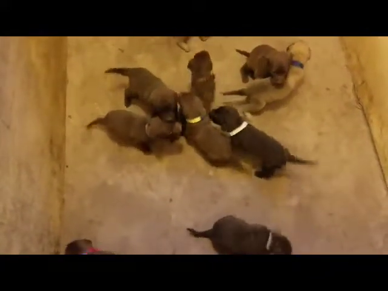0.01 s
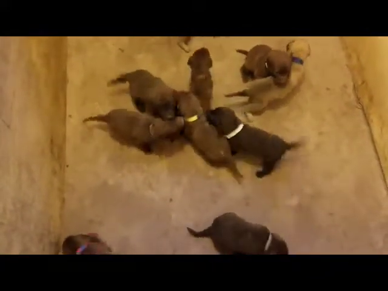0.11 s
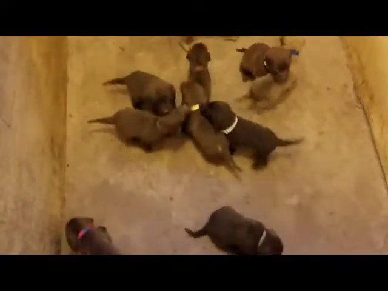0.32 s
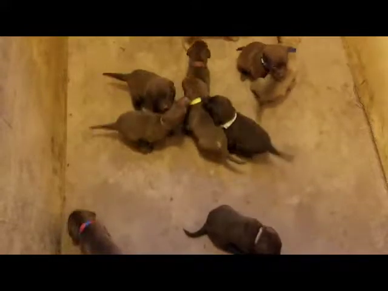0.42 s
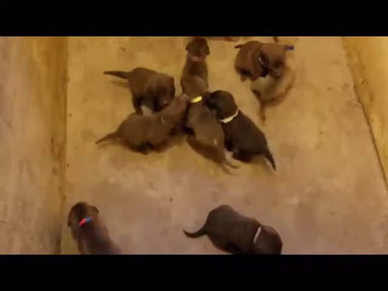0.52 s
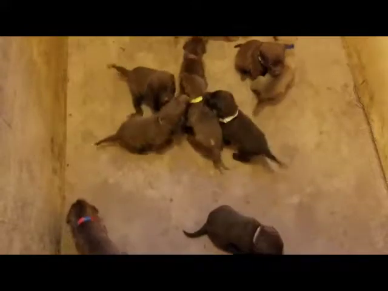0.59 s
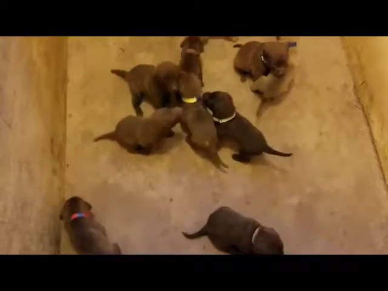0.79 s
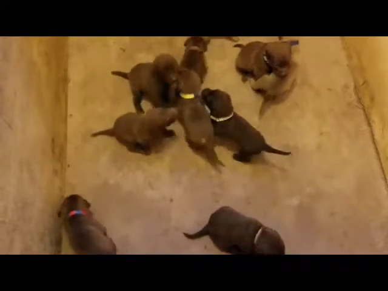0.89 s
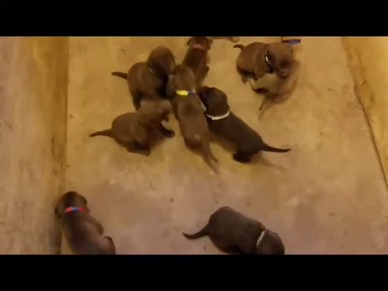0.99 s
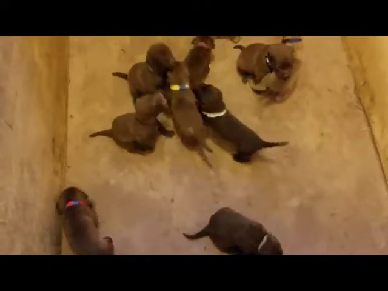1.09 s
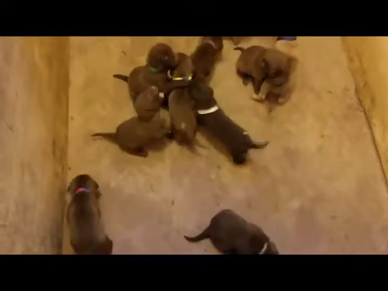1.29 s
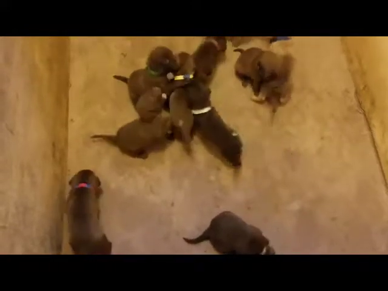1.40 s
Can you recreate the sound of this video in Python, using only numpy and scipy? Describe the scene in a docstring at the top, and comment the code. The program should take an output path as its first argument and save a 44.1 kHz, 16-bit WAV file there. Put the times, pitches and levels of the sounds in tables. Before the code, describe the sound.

One puppy yelps loudly once, breaking upward, turning raspy and sagging away; soft paw thuds and scuffs before and after, in a small hard-walled pen with a short echo, over very faint hum.

```python
"""The hum of a building, a dying whine and a faint scuff come first; then a puppy yelps in a bare concrete pen.
The yelp, a harmonic series filtered by the throat, breaks upward, turns hoarse and sags away into the room;
a ragged second tone joins it. Paws thud as a damped floor resonance and scuff as bursts of band noise.
Hum and whine are filtered noise; early echoes and a decaying diffuse tail make the pen."""
import sys
import numpy as np
from scipy import signal
from scipy.fft import rfft, irfft, next_fast_len
from scipy.io import wavfile
from scipy.ndimage import uniform_filter1d, minimum_filter1d

SR = 44100
rng = np.random.default_rng(int(sys.argv[2]) if len(sys.argv) > 2 else 0)


def digitize_waveform(pressure):
    """Quantize a signal to 16-bit integers and store it at the path in sys.argv[1].

    Rows of a 2-D input are taken as channels; values are limited to [-1, 1].
    """
    field = np.atleast_2d(pressure).T
    bounded = np.clip(field, -1, 1)
    quanta = np.round(bounded * 32767).astype(np.int16)
    wavfile.write(sys.argv[1], SR, quanta)


def magnitude_from_level(level_db):
    """Linear magnitude for a level in decibels (20 dB per decade)."""
    exponent = np.asarray(level_db, float) / 20
    return 10 ** exponent


N = 61740   # samples in the scene

# relative spectrum of the building's hum: frequency_hz, level_db
HUM_SPECTRUM = [(15, -47), (25, -22.5), (164, 1.5), (209, -12), (312, -9), (387, -12.5), (467, -10.5),
                (627, -16), (737, -15.5), (990, -18), (15300, -41.5)]
HUM_DB = -60
# left-right correlation of hum and reverberation: frequency_hz, correlation (0-1)
CORRELATION = [(60, .95), (200, .97), (400, .85), (800, .4), (3000, .3), (6000, .1)]

# decaying bands of an earlier whine: centre_hz, level_db (at time zero), t60_s
WHINE_BANDS = [(859.4, -56.5, 0.14), (1860, -59.5, 0.53)]
WHINE_EDGE_RATIO = 1.05   # band edge to centre

# paws scuffing: start_s, length_s (rise and hold), level_db, centre_hz, width_octaves
PAW_SCUFFS = [(.001, .2, -69, 6084, 2.5), (0.107, .006, -50, 850, 1.42), (0.085, 0.047, -61, 1200, 1.9),
              (.122, 0.059, -56, 1000, 2.2), (0.201, 0.062, -60, 278, 1.4),
              (0.507, 0.057, -53, 654.4, 0.19), (0.834, 0.027, -63, 351, 1.5),
              (0.864, 0.035, -63, 400, 2.44), (0.834, 0.037, -66.5, 3000, 1.1),
              (.846, 0.023, -70, 8520, 0.45), (1.038, .02, -70.5, 8420, 0.47),
              (1.103, .07, -70.5, 1240, 1.84), (1.298, 0.027, -68.5, 2715, .25),
              (1.279, 0.032, -71.5, 3540, 0.14), (1.343, .06, -64.5, 1510, 1.5)]
SCUFF_RISE_S = .004
SCUFF_FADE_S = 0.017   # time to fall by e squared

# paws landing: start_s, strike_db
PAW_THUDS = [(0.058, -52), (0.169, -47), (0.288, -52), (0.804, -57), (0.88, -50.5), (1.096, -49),
             (1.156, -53), (1.29, -52.5), (1.331, -51), (1.352, -53), (1.372, -51)]
THUD_HZ, THUD_T60_S = 154, 0.089
THUD_ROOM_DB = -13   # share of the thuds that sounds in the room

# course of the yelp: time_s, pitch_hz, level_db, hoarseness (0-1),
# first_db (first partial re second), bright_db (partials from the fourth up re second; the third takes it twice)
YELP_COURSE = [(.2245, 885, -48, 0, 5, -9), (0.228, 922.5, -32, 0.11, 4, -10.5),
               (0.235, 867.3, -21, 0.1, -0.5, -13.5), (.241, 906.8, -11.5, 0, -11, -16.5),
               (0.245, 926.6, -10, 0.05, -9.5, -13.5), (0.248, 1115, -14.5, .05, -18, -6.5),
               (0.267, 1119, -15.5, 0.25, -13, 0.5), (0.281, 1289, -19.5, 0.22, -7.5, 1.8),
               (.29, 1352, -14.5, 0.2, -7, 0.1), (0.302, 1287, -15.5, .06, -10, -2.1),
               (0.318, 1343, -17.5, .08, -9, -2.64), (.331, 1563, -13, 0.2, 6.9, 5),
               (.345, 1557, -11.5, 0.3, 1.5, -6), (.354, 1614, -13, 0.4, 0, -17.5),
               (.359, 1283, -19, .3, -13, -3), (.373, 1223, -12, .3, -15, -12),
               (.41, 1207, -14.5, 0.4, -5.5, -8.5), (0.427, 1130, -17.5, .15, -5, -13),
               (0.454, 1137, -16, 0.21, -2.5, -12), (0.472, 1056, -19.5, 0.47, -1, -23.5),
               (.505, 1038, -26, 0.47, 1, -10), (0.519, 653.5, -26, 0.22, -2, -42),
               (.56, 636.6, -35.5, 0.42, -1, -7.5), (0.602, 631.7, -49, 0.42, -2.5, -22.5)]
# response of throat and mouth: frequency_hz, gain_db
THROAT_RESPONSE = [(300, -44), (630, -39.5), (900, -20), (1100, -13), (1350, -3), (1600, 2.5), (1900, 0.5),
                   (2100, -7), (2350, -0.5), (2650, -4.5), (3000, -13.5), (3900, -9), (4400, -17),
                   (5300, -18), (6600, -13.5), (7600, -24.5), (9100, -21.5), (10000, -41), (12000, -44.5),
                   (15000, -67)]
JITTER, JITTER_HZ = .06, 210   # relative pitch spread at full hoarseness; corner of the random modulation
SHIMMER_DB = 13.5              # spread of the partials' level at full hoarseness
BREATH_DB = 4                  # breath gain at full hoarseness, ahead of a doubling
FLICKER_DB, FLICKER_HZ = 5, 70   # level spread of each partial from the fourth up

# ragged second oscillation: time_s, pitch_hz, level_db
RASP_COURSE = [(.34, 1600, -38.5), (0.357, 1657, -18.5), (0.373, 1802, -16.5), (.385, 1681, -28),
               (.405, 1846, -23), (.43, 1746, -26), (.455, 1644, -27), (.49, 1789, -29.5),
               (.52, 1688, -49.5)]
RASP_JITTER = .09   # relative pitch spread

# early reflections from floor and walls: left_s, right_s, level_db (re direct sound)
REFLECTIONS = [(0.0129, .0149, -6.5), (.021, 0.013, -11), (0.028, .0294, -12), (.038, .0371, -11.5)]
# decay of the diffuse tail: frequency_hz, t60_s
DECAY_TIMES = [(250, 0.78), (700, 0.35), (1400, 0.36), (2700, 0.38), (5400, 0.32), (8000, 0.2),
               (12000, 0.28)]
TAIL_DB, TAIL_ONSET_S = -3.5, 0.018   # tail energy re direct sound; time scale of its build-up
LEFT_LAG = 2   # samples by which the direct sound reaches the left port late

# shading of one port by the recorder's body: frequency_hz, left_minus_right_db
PORT_SHADING = [(300, 0.3), (1000, 1.5), (2400, 1), (4400, -3.5), (6500, -8), (9000, -12), (12000, 2)]
CEILING_DB, RECOVERY_DB_PER_S = -.6, 120


def at_hz(points, hz):
    """Interpolate a spectrum linearly over the logarithm of frequency."""
    p = np.array(points)
    return np.interp(np.log(np.maximum(hz, 1)), np.log(p[:, 0]), p[:, 1])


def rms_one(x):
    """Normalise to unit root-mean-square amplitude."""
    return x / np.sqrt(np.mean(x ** 2) + 1e-20)


def drift(rate_hz):
    """Random modulation of unit spread: white noise through two equal low-pass poles."""
    r = np.exp(-2 * np.pi * rate_hz / SR)
    noise = rng.standard_normal(N + SR)
    settled = signal.lfilter([1], [1, -2 * r, r * r], noise)[SR:]
    return rms_one(settled)


def coloured(x, db):
    """Minimum-phase filtering: folding the cepstrum makes a gain curve causal."""
    size = next_fast_len(x.shape[-1] + 4096) // 2 * 2
    log_gain = at_hz(db, np.fft.rfftfreq(size, 1 / SR)) * np.log(10) / 20
    cepstrum = irfft(log_gain, size)
    cepstrum[1:size // 2] *= 2
    cepstrum[size // 2 + 1:] = 0
    return irfft(rfft(x, size) * np.exp(rfft(cepstrum)), size)[..., :x.shape[-1]]


def stereo_noise(size):
    """Partial coherence: sum and difference of two noise spectra set the left-right correlation."""
    alike = np.clip(at_hz(CORRELATION, np.fft.rfftfreq(size, 1 / SR)), 0, 1)
    mid, side = rfft(rng.standard_normal((2, size)))
    return np.sqrt(1 + alike) * mid + np.sqrt(1 - alike) * side * np.array([[1], [-1]])


def hum():
    """Stationary noise shaped in spectrum, its level wandering slightly."""
    gain = magnitude_from_level(at_hz(HUM_SPECTRUM, np.fft.rfftfreq(N, 1 / SR)))
    pair = irfft(stereo_noise(N) * gain, N)
    return magnitude_from_level(HUM_DB + 1.5 * drift(5)) * rms_one(pair)


def old_whine():
    """Exponential decay of narrow noise bands, independent at left and right."""
    t = np.arange(N) / SR
    out = 0
    for hz, db, t60 in WHINE_BANDS:
        edges = [hz / WHINE_EDGE_RATIO, hz * WHINE_EDGE_RATIO]
        band = signal.butter(2, edges, "band", fs=SR, output="sos")
        noise = rms_one(signal.sosfilt(band, rng.standard_normal((2, N))))
        out = out + noise * magnitude_from_level(db - 60 * t / t60)
    return out


def scuffs():
    """Friction as grainy band-limited noise: quick rise, hold, exponential fade."""
    t, out = np.arange(N) / SR, 0
    for s, length, db, hz, octaves in PAW_SCUFFS:
        edges = np.clip(hz * 2.0 ** (np.array([-.5, .5]) * max(octaves, .1)), 40, 15000)
        grain = rng.standard_normal(N) * magnitude_from_level(3.0 * drift(80))
        band = rms_one(signal.sosfilt(signal.butter(2, edges, "band", fs=SR, output="sos"), grain))
        rise = np.clip((t - s) / SCUFF_RISE_S, 0, 1)
        fade = np.exp(-np.maximum(t - s - length, 0) / SCUFF_FADE_S * 2)
        out = out + magnitude_from_level(db) * rise * fade * band
    return out


def thuds():
    """Impulse excitation of a damped resonance: each landing rings the floor briefly."""
    hits = np.full(N, 1e-18)
    for s, db in PAW_THUDS:
        hits[int(s * SR)] = magnitude_from_level(db)
    r = magnitude_from_level(-60 / (THUD_T60_S * SR))
    w = 2 * np.pi * THUD_HZ / SR
    ring = signal.lfilter([0, np.sin(w)], [1, -2 * r * np.cos(w), r * r], hits)
    return signal.sosfilt(signal.butter(2, 500, fs=SR, output="sos"), ring)   # low-pass


def yelp():
    """Source and filter: glottal partials with jitter, shimmer and cycle-gated breath excite the throat."""
    s, *cols = np.transpose(YELP_COURSE)
    t = np.arange(N) / SR
    hz, level_db, rough, first_db, bright_db = [np.interp(t, s, c) for c in cols]
    rough = np.clip(rough, 0, 1)
    phase = 2 * np.pi * np.cumsum(hz * (1 + JITTER * rough * drift(JITTER_HZ))) / SR

    first = magnitude_from_level(first_db) * np.cos(phase)
    second = np.cos(2 * phase)
    third = magnitude_from_level(2 * bright_db) * np.cos(3 * phase)   # brightens twice as fast as those above
    upper = 0
    for k in range(4, 22):
        flicker = magnitude_from_level(FLICKER_DB * drift(FLICKER_HZ))
        upper = upper + np.cos(k * phase) * flicker * (k * hz < 15000)
    pulses = first + second + third + magnitude_from_level(bright_db) * upper

    breath = rng.standard_normal(N) * (1 + np.cos(phase)) * 2 * magnitude_from_level(BREATH_DB) * rough
    source = pulses * magnitude_from_level(SHIMMER_DB * rough * drift(JITTER_HZ)) + breath
    voice = coloured(source, THROAT_RESPONSE)
    # even out the running level, then impose the yelp's own
    running_rms = np.sqrt(uniform_filter1d(voice ** 2, size=600) + 1e-9)
    return voice / running_rms * magnitude_from_level(level_db) * ((t > s[0]) & (t < s[-1]))


def rasp():
    """Random frequency and amplitude modulation roughen a single sine."""
    s, hz, db = np.transpose(RASP_COURSE)
    t = np.arange(N) / SR
    phase = 2 * np.pi * np.cumsum(np.interp(t, s, hz) * (1 + RASP_JITTER * drift(200))) / SR
    level_db = np.interp(t, s, db, -200, -200) + 4.5 * drift(100)
    return np.sqrt(2) * np.sin(phase) * magnitude_from_level(level_db)


def pen(x):
    """Room response by convolution: direct sound, early reflections, and a tail decaying band by band."""
    size = int(.9 * SR)
    t = np.arange(size) / SR
    white = irfft(stereo_noise(size), size)
    edges = 60 * 2 ** np.arange(0, 8.3, .5)   # half-octave bands
    tail = 0
    for low, high in zip(edges, edges[1:]):
        band = signal.butter(2, [low, high], "band", fs=SR, output="sos")
        t60 = at_hz(DECAY_TIMES, np.sqrt(low * high))
        tail = tail + signal.sosfilt(band, white) * magnitude_from_level(-60 * t / t60)
    tail = tail * (1 - np.exp(-(t / TAIL_ONSET_S) ** 2))
    response = magnitude_from_level(TAIL_DB) * tail / np.sqrt(np.sum(tail ** 2) / 2)
    response[[0, 1], [LEFT_LAG, 0]] += 1   # direct sound
    for left, right, db in REFLECTIONS:
        response[[0, 1], [int(left * SR), int(right * SR)]] += magnitude_from_level(db)
    return signal.fftconvolve(x[None], response, axes=1)[:, :N]


def scene():
    """Superposition: voice and paws excite the pen; thuds come mostly through the floor."""
    floor = thuds()
    in_room = yelp() + rasp() + scuffs() + magnitude_from_level(THUD_ROOM_DB) * floor
    return pen(in_room) + floor + old_whine() + hum()


def limiter(x):
    """Peak limiting: gain falls 2 ms ahead of a peak above the ceiling and recovers steadily."""
    over = np.maximum(20 * np.log10(np.abs(x).max(axis=0) + 1e-9) - CEILING_DB, 0)
    ahead = -minimum_filter1d(-over, size=177)
    ramp = RECOVERY_DB_PER_S * np.arange(N) / SR
    held = np.maximum.accumulate(ahead + ramp) - ramp
    return x * magnitude_from_level(-uniform_filter1d(held, size=89))


def top_cut(x):
    """Nothing passes above the cut-off."""
    return signal.sosfilt(signal.butter(12, 15470, fs=SR, output="sos"), x)


def record(dry):
    """Diffraction shading: each port takes half the level difference, with opposite sign, then the limiter."""
    shade = np.array(PORT_SHADING)
    ports = [coloured(ch, shade * [1, side]) for ch, side in zip(dry, (.5, -.5))]
    mix = limiter(np.array(ports))
    return top_cut(mix)


dry = scene()
out = record(dry)
digitize_waveform(out)
```